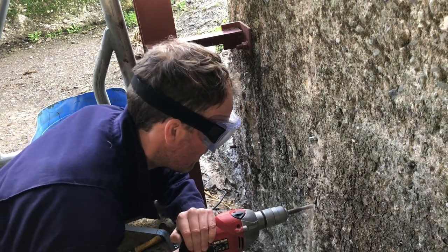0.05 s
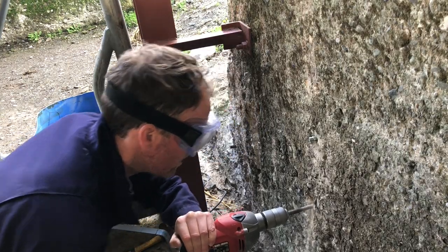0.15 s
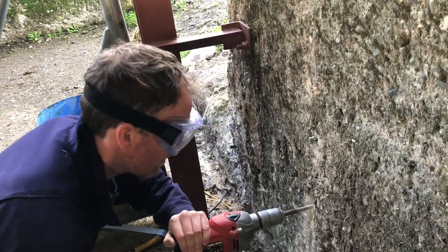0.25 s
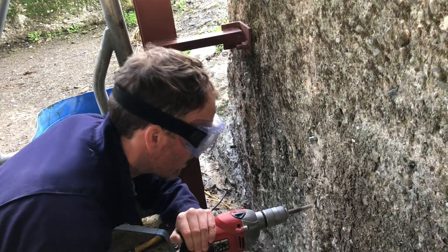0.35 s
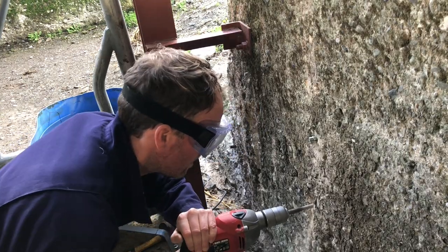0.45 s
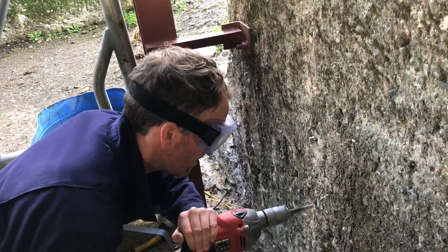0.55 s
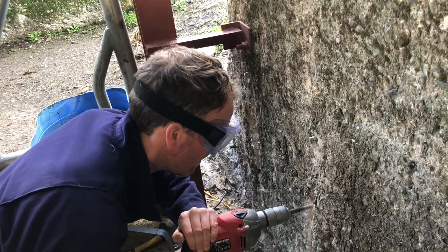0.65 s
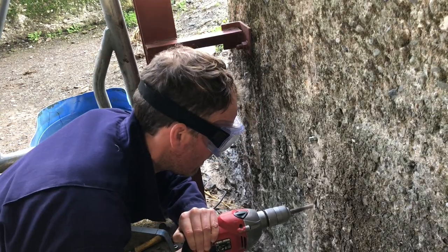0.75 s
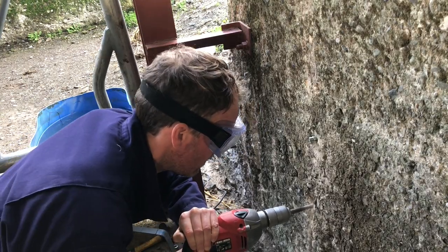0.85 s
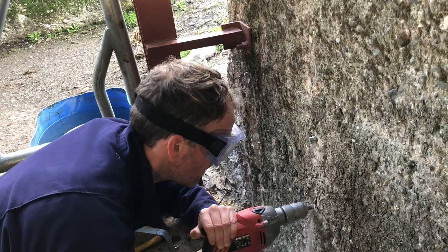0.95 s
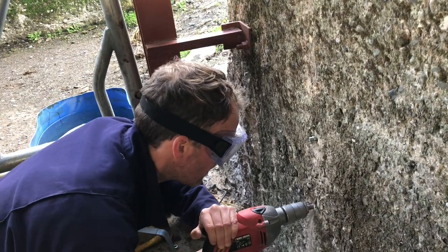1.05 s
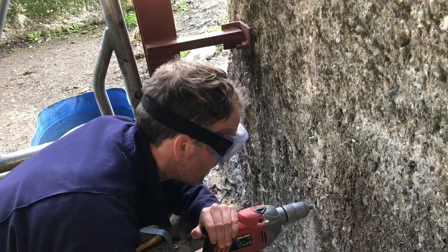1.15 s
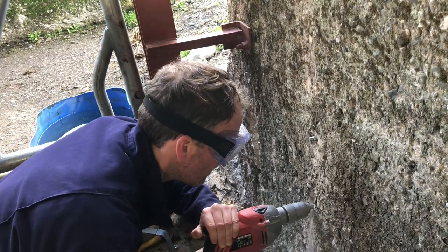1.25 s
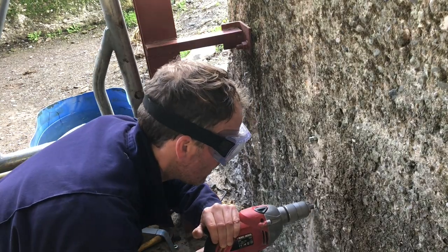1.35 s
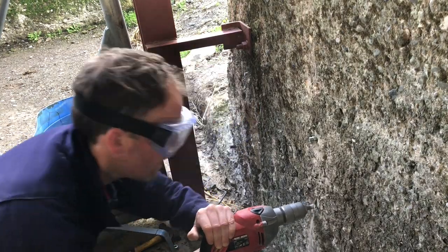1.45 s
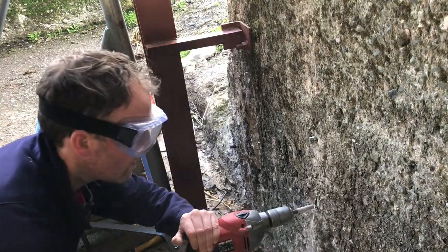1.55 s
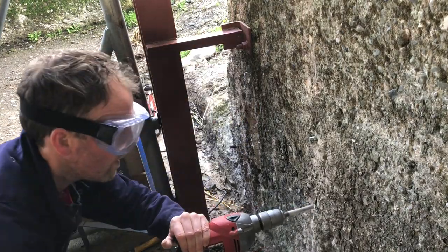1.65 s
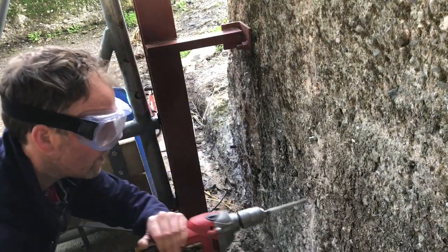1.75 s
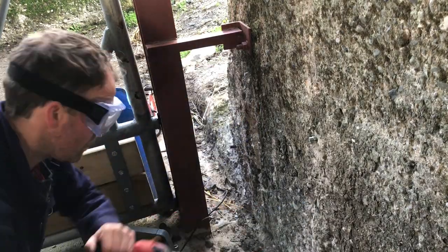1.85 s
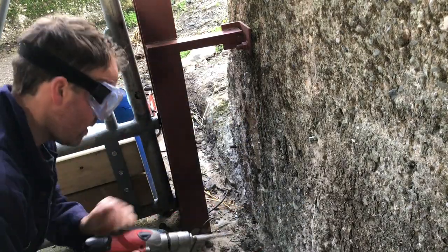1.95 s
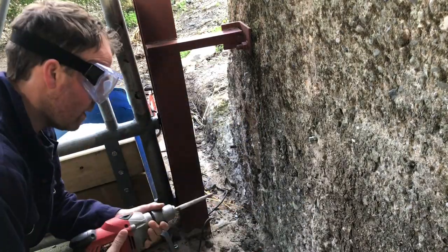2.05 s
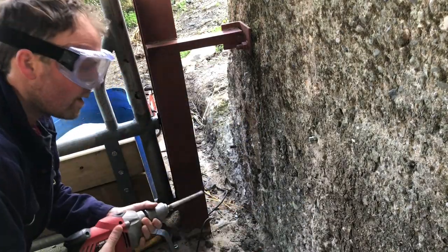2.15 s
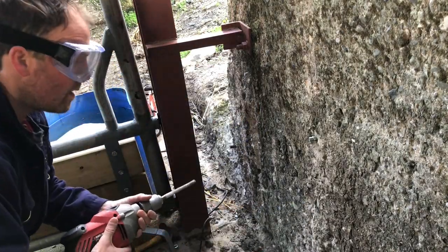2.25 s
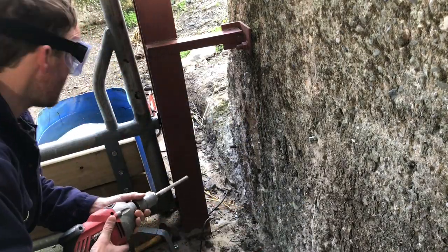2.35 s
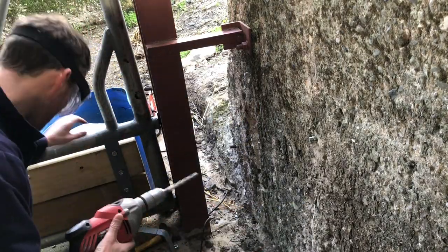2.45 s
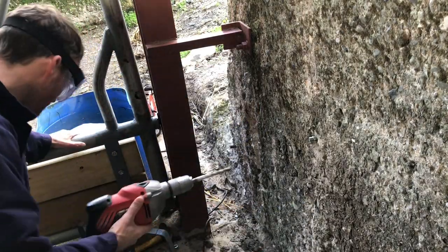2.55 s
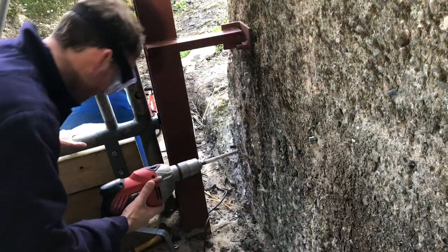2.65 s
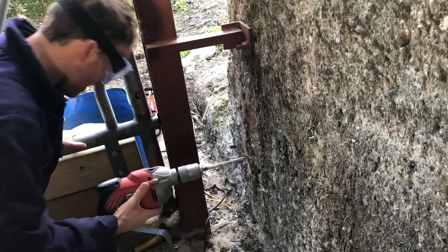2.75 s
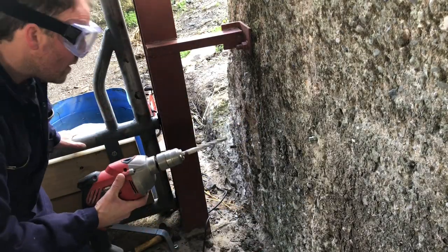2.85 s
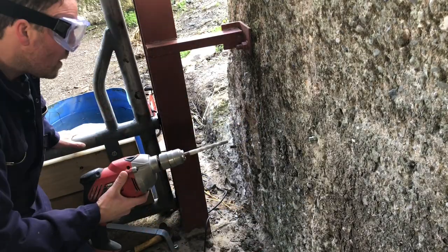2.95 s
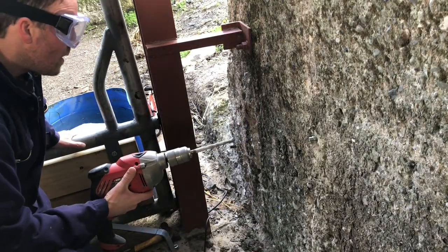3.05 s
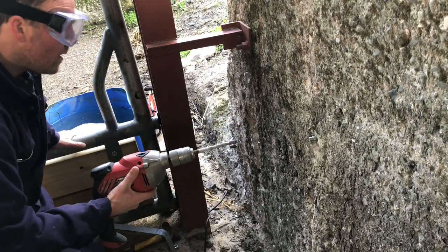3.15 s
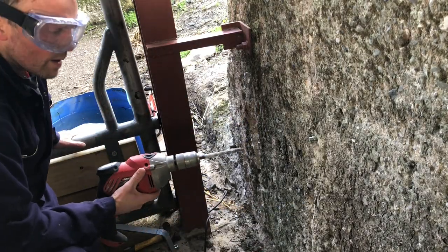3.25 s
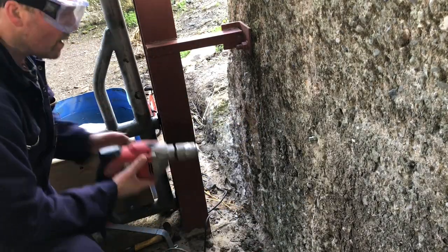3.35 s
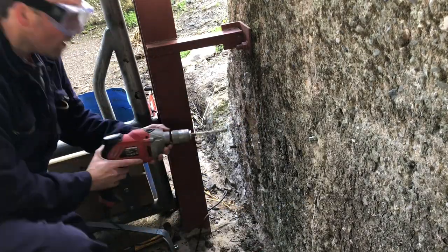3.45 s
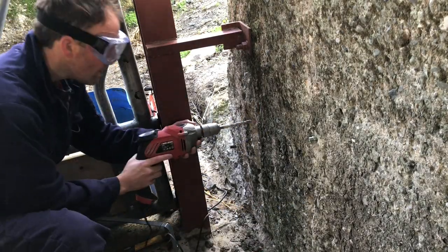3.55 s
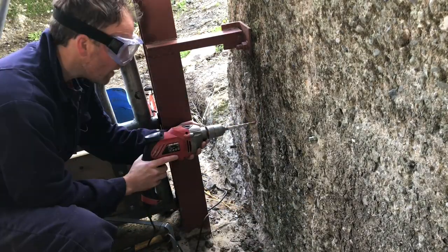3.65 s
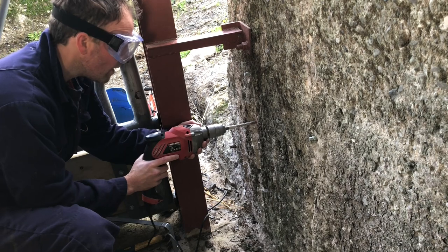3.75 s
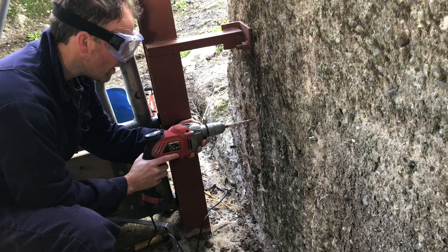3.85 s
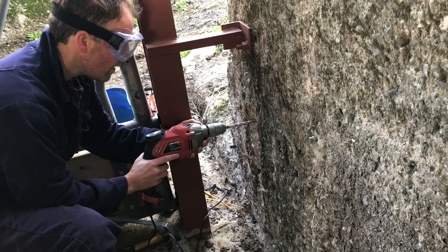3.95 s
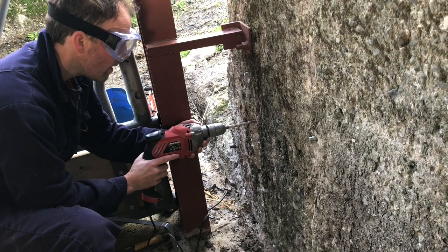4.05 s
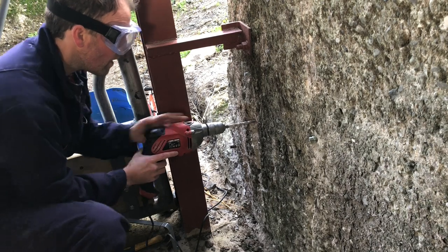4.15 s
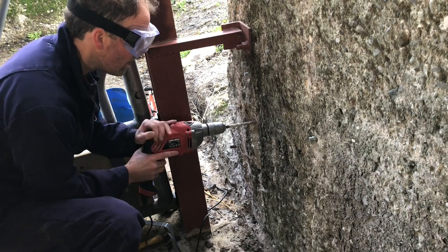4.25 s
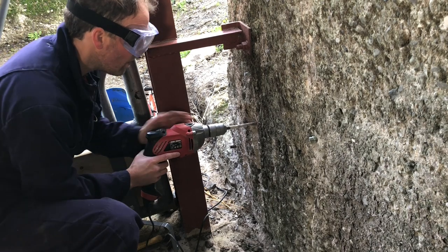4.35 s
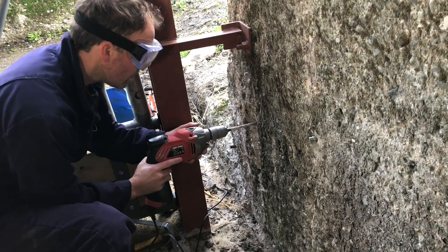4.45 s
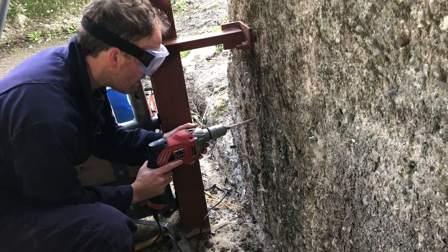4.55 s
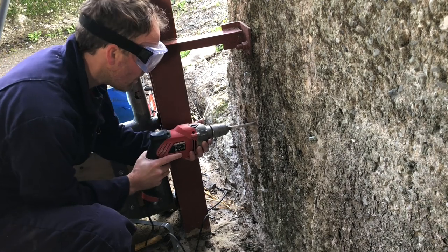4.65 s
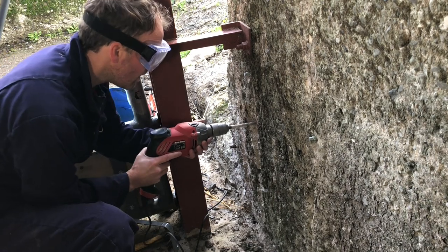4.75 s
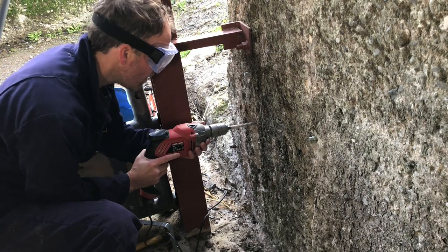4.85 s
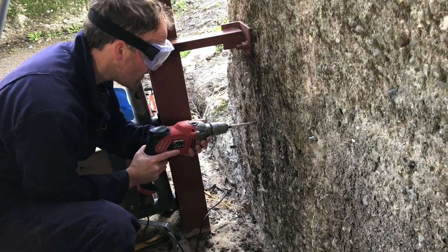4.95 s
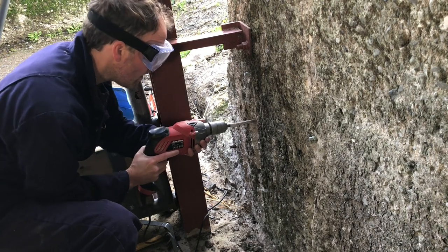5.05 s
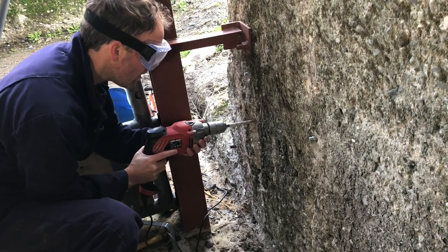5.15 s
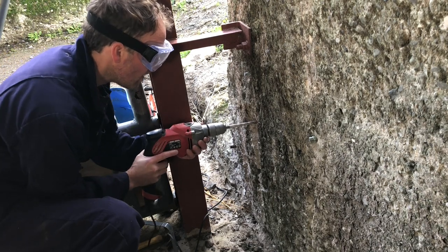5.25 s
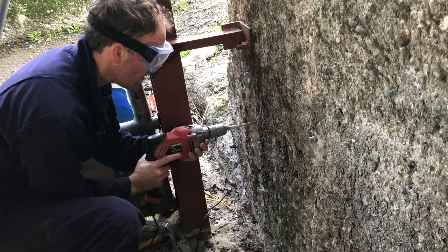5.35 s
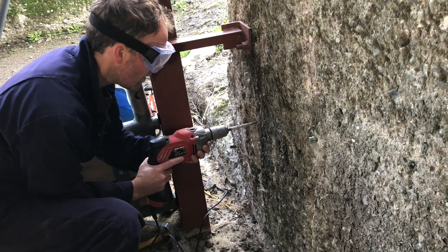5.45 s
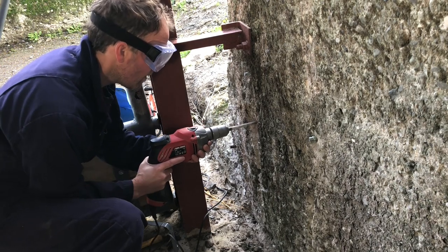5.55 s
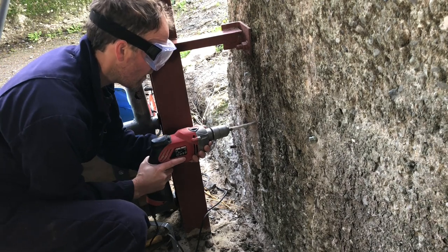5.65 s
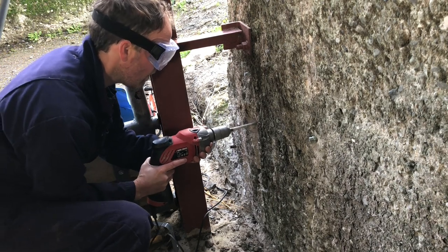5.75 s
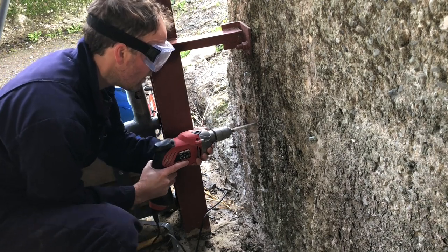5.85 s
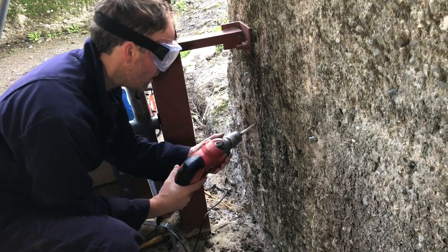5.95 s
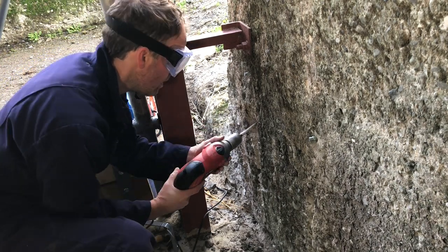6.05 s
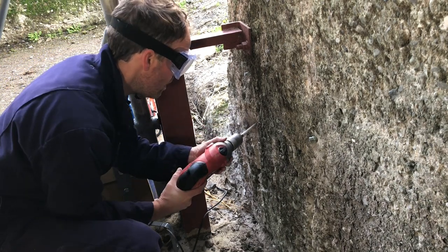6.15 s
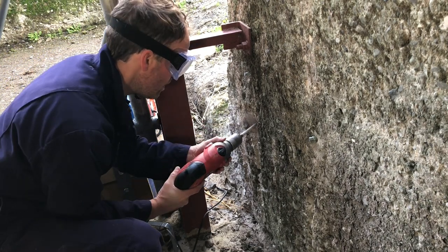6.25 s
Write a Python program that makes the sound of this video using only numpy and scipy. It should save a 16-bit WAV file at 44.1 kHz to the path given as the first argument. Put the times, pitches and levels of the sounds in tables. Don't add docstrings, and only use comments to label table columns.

```python
import sys
import numpy as np
from scipy import signal
from scipy.fft import rfft, irfft, next_fast_len
from scipy.io import wavfile
from scipy.ndimage import uniform_filter1d

SR = 44100
rng = np.random.default_rng(int(sys.argv[2]) if len(sys.argv) > 2 else 0)


def materialize(psi):
    bounded = np.clip(np.atleast_2d(psi).T, -1, 1)
    quanta = np.round(bounded * 32767).astype(np.int16)
    wavfile.write(sys.argv[1], SR, quanta)


def volts_from_db(level):
    exponent = np.asarray(level, float) / 20
    return 10 ** exponent


N = 277830

CLICKS_PER_TURN = 7.563
# start_s, end_s
LOUD = [
    (0, .175),
    (.32, 1.44),
    (5.56, 5.81),
    (6.07, 6.4),
]
# start_s, end_s
SEATED = [
    (0, .18),
    (.55, 1.455),
    (5.54, 5.83),
    (6.06, 6.4),
]
# time_s, click_rate_hz, effort_db, whine_db (of the click rate)
TAIL_OF_BURST = [(0, 1790, -25, -29.5), (.06, 1624, -24, -39.5), (.11, 1592, -22.5, -43),
                 (.145, 1660, -24.5, -36.5), (.17, 1825, -27, -36), (.18, 1860, -35, -49)]
EASED_OFF = [(.185, 1524, -36.5, -52), (.24, 1562, -34.5, -48.5), (0.324, 1667, -31, -44)]
BITE = [(.337, 2651, -24, -36), (.44, 2245, -23, -27), (.51, 1990, -24, -26.5), (.555, 1838, -24.5, -29),
        (.645, 1882, -24.5, -29.5), (.72, 1870, -23.5, -29.5), (.795, 1792, -22, -32.5),
        (.86, 1645, -24, -35), (.925, 1684, -22.5, -37.5)]
DEEPER = [(0.946, 1975, -24.5, -20.5), (.958, 1945, -24.5, -31), (.995, 1883, -26, -30.5),
          (1.055, 1861, -26, -31), (1.1, 1793, -25, -33), (1.2, 1781, -24.5, -35),
          (1.261, 1675, -24.5, -35), (1.4, 1610, -25.5, -40.5), (1.445, 1700, -26, -41.5)]
PULL_OUT = [(1.47, 1352, -40.5, -62), (1.51, 1426, -36, -57), (1.64, 1655, -32, -46),
            (1.699, 1730, -31.5, -40.5), (1.771, 1770, -31.5, -40.5), (1.9, 1470, -36.5, -57)]
RUN_DOWN = [(2.0, 1334, -35.5, -59), (2.3, 910, -39.6, -53), (2.55, 707, -42.5, -58), (2.88, 507, -46, -71),
            (3.2, 333, -48.3, -80), (3.4, 229, -50.5, -80), (3.66, 106, -57, -85), (3.79, 46, -62.5, -90),
            (3.86, 14, -87, -90)]
NUDGE = [(4.245, 214.8, -72, -80.5), (4.252, 219.2, -50, -75), (4.275, 290.3, -39.5, -68),
         (4.3, 390, -38.5, -58), (4.33, 440.4, -35, -57), (4.385, 485, -37.5, -65),
         (4.405, 490.7, -43, -67), (4.48, 488.5, -45.5, -65)]
SECOND_NUDGE = [(4.709, 482, -47, -71), (4.743, 482.3, -42.5, -65), (4.752, 474.8, -37, -65),
                (4.795, 479, -35, -65), (4.93, 475.6, -45.5, -65), (5.02, 471.8, -40.5, -65)]
CRAWL = [(5.04, 469.7, -38, -65), (5.181, 469.3, -36.5, -64), (5.298, 465, -35, -61.5),
         (5.459, 416, -33.5, -52.5)]
REV = [(5.5, 569, -30, -57), (5.55, 959.5, -23, -37), (5.6, 1190, -22.5, -35.5), (5.68, 1252, -22, -37),
       (5.78, 1157, -22, -32), (5.806, 1161, -22, -35), (5.825, 1174, -27.5, -44)]
LAST_BURST = [(5.84, 1184, -40.5, -45), (5.89, 1100, -33, -49), (5.9, 1100, -29, -54),
              (6.0, 923, -25.5, -53), (6.05, 748, -25.5, -43), (6.1, 1280, -20, -37),
              (6.15, 2037, -23.5, -32), (6.2, 2188, -22, -26.5), (6.3, 2165, -22.5, -27.5)]
PULLS = [TAIL_OF_BURST, EASED_OFF, BITE, DEEPER, PULL_OUT, RUN_DOWN,
         NUDGE, SECOND_NUDGE, CRAWL, REV, LAST_BURST]


def unit(x):
    return x / np.sqrt(np.mean(x ** 2) + 1e-20)


def curves(rows):
    s, *cols = np.transpose(rows)
    return [np.interp(np.arange(N) / SR, s, c) for c in cols]


def gate(spans, fade_s):
    t = np.arange(N) / SR
    inside = sum((t >= a) & (t <= b) for a, b in spans)
    return uniform_filter1d(np.minimum(inside, 1.0), int(fade_s * SR) + 1)


def wobble(rate_hz):
    knots = rng.standard_normal(int(N * rate_hz / SR) + 2)
    return np.interp(np.arange(N) * rate_hz / SR, np.arange(len(knots)), knots)


def coloured(x, spectrum):
    m = next_fast_len(N + 8192)
    hz, db = np.transpose(spectrum)
    gain = volts_from_db(np.interp(np.log(np.fft.rfftfreq(m, 1 / SR) + 1), np.log(hz + 1), db))
    return unit(irfft(rfft(x, m) * gain, m)[:N])


def patchy(patchy_db, frames=10):
    z = signal.stft(rng.standard_normal(N), nperseg=512)[2]
    field = uniform_filter1d(rng.standard_normal(z.shape), 6, 0)
    field = uniform_filter1d(field, frames, 1)
    return signal.istft(z * volts_from_db(patchy_db * unit(field)), nperseg=512)[1][:N]


def resonance(modes, hz):
    grid_hz = np.arange(SR // 2)
    gain = sum(volts_from_db(db) / (1 + (2 * (grid_hz - centre) / width) ** 2) for centre, width, db in modes)
    return gain[np.minimum(hz, grid_hz[-1]).astype(int)]


def per_pull():
    # rattle_db and grind_db (over effort), click_sharpness (0-1),
    # first_wall_share (0-1), gear_strain_db
    contacts = [(2.5, -23, 0.7, 0.7, 0), (-0.5, -17.5, 0.6, .55, -6.5), (-1, -24, 0.4, 0.7, -2),
                (-1, -27, .35, 0.6, 1.5), (-1, -15.5, 0.2, 0.62, 0), (-6, -16, .05, 0.81, 0),
                (1, -12, 0.3, 0.03, 0), (0, -13, 0.6, 0.13, 0), (2, -15.5, .15, 0, -4),
                (-0.5, -21.5, .05, 0.32, 0), (-1, -31, 0.5, 0.1, 0.5)]
    starts_s = np.array([pull[0][0] for pull in PULLS])
    t = np.arange(N) / SR
    now = np.searchsorted(starts_s, t, side="right") - 1
    held = [uniform_filter1d(c[now], size=400) for c in np.transpose(contacts)]
    return held + [t - starts_s[now]]


def whine(rate_hz, cycles, effort_db, whine_db):
    # start_s, end_s
    biting = [(0, .18), (.33, 1.455), (5.04, 5.83), (5.91, 6.4)]
    # start_s, end_s
    singing = [(0, .178), (.2, .325), (.335, .93), (.95, 1.455), (1.5, 3.15), (4.265, 4.4), (5.04, 5.84),
               (5.91, 6.4)]
    # overtone, armature_turns_away, seated_db, loose_db (over effort)
    pressed = [(1, -3, -30, -13), (1, -2, -28, -8), (1, -1, -24, -8), (1, 1, -12, -8), (2, -4, -30, -12),
               (2, -1, -9, -22), (2, 0, -8.5, -13), (2, 1, -10, -24), (3, -2, -18, -24), (3, 0, -15, -22),
               (5, 0, -23, -30)]
    neighbours = {1: (-3, -2, -1, 2, 3), 2: (-3, -2, 2, 3), 3: (-2, -1, 1, 2), 4: (-1, 0, 1, 3), 5: (-1, 2)}
    # centre_hz, width_hz, gain_db
    gearbox = [(2200, 750, -3), (3170, 200, -2), (3450, 260, 0), (4030, 240, -4), (5600, 800, -4)]
    # centre_hz, width_hz, gain_db
    gearbox_later = [(1900, 600, -6), (2480, 260, -3), (3720, 320, 1), (4290, 420, 2), (6050, 500, -1)]
    # centre_hz, width_hz, gain_db
    housing = [(2150, 800, -4), (3450, 500, 1), (4080, 400, -1), (5450, 900, -1), (7300, 1500, -3)]
    second_hole_s, mesh_per_click = 4, 4.62

    strain_db = per_pull()[4]
    bite = gate(biting, fade_s=0.024) * volts_from_db(effort_db + strain_db)
    seated = gate(SEATED, fade_s=0.068)
    later = np.arange(N) > second_hole_s * SR
    lines = [(1, 0, volts_from_db(whine_db))]

    mesh = resonance([(4700, 2000, -16)], mesh_per_click * rate_hz)
    lines.append((mesh_per_click, 0, volts_from_db(effort_db) * gate([(1.9, 2.5)], fade_s=.15) * mesh))

    for k, n, seated_db, loose_db in pressed:
        hz = rate_hz * (k + n / CLICKS_PER_TURN)
        outlet = np.where(later, resonance(gearbox_later, hz), resonance(gearbox, hz))
        level_db = loose_db + (seated_db - loose_db) * seated + 1.6 * wobble(9)
        lines.append((k, n, bite * volts_from_db(level_db) * outlet))

    load = volts_from_db(-46) * gate(LOUD, fade_s=.03)
    for k, away in neighbours.items():
        for n in away:
            body = .08 + resonance(housing, rate_hz * (k + n / CLICKS_PER_TURN))
            lines.append((k, n, load * volts_from_db(3 * wobble(11)) * body))

    spin = 2 * np.pi * (cycles + .02 * wobble(120))
    tone = 0
    for k, n, gain in lines:
        phase = (k + n / CLICKS_PER_TURN) * spin + 2 * np.pi * rng.random()
        tone = tone + gain * volts_from_db(0.77 * wobble(70)) * np.sin(phase)
    return volts_from_db(4.2) * tone * gate(singing, fade_s=.012)


def skids():
    # start_s, level_db (over the scrape), decay_s
    slips = [(4.488, 5, .011), (4.606, 8, .008), (4.65, 2, .01), (4.678, 12, .004), (4.687, 8, .008)]
    t = np.arange(N) / SR
    return 1 + sum(volts_from_db(db) * (t > s) * np.exp(-np.abs(t - s) / decay_s) for s, db, decay_s in slips)


def clatter(cycles, effort_db):
    # pitch_hz, level_db (per Hz)
    hiss_spectrum = [(1760, -33), (3000, -8.5), (3110, -17.5), (3560, -7.5), (4060, -5.5), (5390, -6.5),
                     (5980, -6), (6450, -6), (7150, -5), (8500, -1), (9960, -3), (11100, -4.5),
                     (12400, -3.5), (14100, -2.5), (15600, -5)]
    first_wall = [(410, -56.5), (700, -43), (1050, -14.5), (1310, -13.5), (1650, -6.5), (2500, -4),
                  (2940, -6), (3300, 2.5), (3780, -6), (4000, -13.5), (4320, -16.5), (7000, 2), (9100, -23),
                  (15400, -120)]
    second_wall = [(410, -52), (700, -14), (1000, -5.5), (1330, -2.5), (1830, 0.5), (2080, 5), (2470, 3),
                   (3460, -6), (3850, -2.5), (5090, -6.5), (7000, -10), (9100, -51), (15400, -120)]
    grind_spectrum = [(150, -43.5), (300, -20.5), (700, -11), (1300, -6), (1700, -6), (2600, -30),
                      (4400, -120)]
    fan_spectrum = [(2500, -51), (3300, -3), (4500, 3.5), (5600, 1), (6500, -20), (8600, -15), (10500, -46),
                    (15000, -39)]
    jolt_db, jolt_s = 4, .03
    damped_db = -4.5

    rattle_db, grind_db, sharp, first, _, since_s = per_pull()
    rattle_db = rattle_db + jolt_db * np.exp(-since_s / jolt_s) + damped_db * gate(SEATED, fade_s=0.057)
    sharp, first = np.clip(sharp, 0, 1), np.clip(first, 0, 1)

    click_size = np.tanh(rng.standard_normal(N))[cycles.astype(int)]
    strike = volts_from_db(8 * click_size * sharp) * np.exp(-3 * (cycles % 1))
    turn = 1 + 0.12 * np.sin(2 * np.pi * cycles / CLICKS_PER_TURN)
    beat = turn * (np.sqrt(1 - sharp) + 3.4 * np.sqrt(sharp) * strike)
    beat = beat / np.sqrt(np.abs(uniform_filter1d(beat ** 2, size=2600))) * skids()

    hiss = coloured(beat * patchy(patchy_db=2.1, frames=45), hiss_spectrum)
    blows = beat * patchy(patchy_db=2.5)
    rattle = first * coloured(blows, first_wall) + (1 - first) * coloured(blows, second_wall)
    grind = coloured(patchy(patchy_db=-3.5), grind_spectrum)
    idling = gate([(1.75, 3.9)], fade_s=0.43)
    fan = volts_from_db(-10.5) * idling * coloured(patchy(patchy_db=4, frames=45), fan_spectrum)
    return volts_from_db(effort_db) * (hiss + fan + volts_from_db(rattle_db - 4.5) * rattle + volts_from_db(grind_db) * grind)


def surroundings():
    # pitch_hz, level_db (per Hz)
    air_spectrum = [(35, -100), (60, -58.5), (160, -25.5), (244, -18.5), (287, -20), (492, -21.5),
                    (579, -17.5), (715, -26), (3670, -32), (16000, -60.5)]
    # time_s, pitch_hz, level_db
    engine = [(.3, 352.4, -61), (.5, 275.5, -69), (1.3, 223.2, -70), (1.5, 201.5, -95), (2.5, 239, -68),
              (3.15, 303, -65), (3.33, 311.6, -68), (3.42, 238.5, -64.5), (4.15, 253.7, -67.5),
              (4.35, 195, -76), (4.6, 213.5, -72.5), (5.4, 210.9, -70), (6.3, 269.3, -66)]
    hz, db = curves(engine)
    cycles = np.cumsum(hz) / SR + 0.082 * wobble(30)
    drone = volts_from_db(db - 1.5 + 2.4 * wobble(13)) * np.sin(2 * np.pi * cycles)
    return volts_from_db(-68) * coloured(patchy(patchy_db=1.5), air_spectrum) + drone


def whistle(rate_hz, effort_db):
    # centre_hz, width_hz, gain_db
    vents = [(4950, 200, 2), (6900, 1200, 1), (8400, 1600, 1), (11500, 1200, 0), (13300, 1200, -2),
             (15000, 1200, -1)]
    bars_per_click = 23.1
    hz = bars_per_click * rate_hz
    db = -59 - .85 * np.abs(effort_db + 49)
    cycles = np.cumsum(hz) / SR + 0.065 * wobble(250)
    tone = 0
    for k in range(1, 9):
        level_db = db - .8 * k - 3 * (k % 2 == 0) + 4 * wobble(14)
        audible = k * hz < SR / 2
        tone = tone + resonance(vents, k * hz) * volts_from_db(level_db) * np.sin(2 * np.pi * k * cycles) * audible
    return volts_from_db(8) * tone * gate([(2.55, 3.77)], fade_s=.05)


def drill():
    rate_hz, effort_db, whine_db = curves(np.concatenate(PULLS))
    cycles = np.cumsum(rate_hz) / SR
    tones = whine(rate_hz, cycles, effort_db, whine_db) + whistle(rate_hz, effort_db)
    return tones + clatter(cycles, effort_db)


def knocks():
    # start_s, peak_db, centre_hz, width_octaves, t60_s
    contacts = [
        (2.765, -55, 350, .8, .07),
        (3.482, -40, 800, 1.4, .03),
        (3.548, -42, 1500, .8, .17),
        (3.903, -63, 7000, 1.1, .02),
        (4.07, -60, 700, .7, .1),
        (4.14, -41, 8000, 1.8, .012),
        (4.14, -45, 2100, .6, .02),
        (4.249, -44, 9000, 1.3, .012),
    ]
    # pitch_hz, level_db, t60_s
    post = [(490, -60, .3), (684, -55, .3), (1390, -55, .2), (2160, -56, .1)]
    ring_s = 3.549
    out, t = np.zeros(N + SR), np.arange(SR // 2) / SR
    f = np.fft.rfftfreq(len(t), 1 / SR) + 1
    for s, db, hz, octaves, t60_s in contacts:
        band = np.exp(-(np.log2(f / hz) / octaves) ** 2) / np.sqrt(f)
        puff = unit(irfft(rfft(rng.standard_normal(len(t))) * band, len(t)))
        out[round(s * SR):][:len(t)] += volts_from_db(db - 60 * t / t60_s) * puff * (1 - np.exp(-t / 0.00068))
    for hz, db, t60_s in post:
        wander = np.cumsum(rng.normal(0, 0.062, len(t)))
        ring = volts_from_db(db - 60 * t / t60_s) * np.sin(2 * np.pi * hz * t + wander)
        out[round(ring_s * SR):][:len(t)] += ring
    return out[:N]


def scene():
    mono = drill() + knocks() + surroundings()
    return np.array([mono, mono])


def top_cut(x):
    return signal.sosfilt(signal.butter(12, 17080, fs=SR, output="sos"), x)


def record(dry):
    # pitch_hz, level_db (per Hz)
    thrum_spectrum = [(15, 5), (60, -0.5), (150, 2.5), (250, -15.5), (400, -120)]
    clip_at = .5
    dry = dry / (1 + (dry / clip_at) ** 4) ** .25
    x = signal.sosfilt(signal.butter(5, 155, "highpass", fs=SR, output="sos"), dry)
    x = x + volts_from_db(-70.5) * gate(LOUD, fade_s=.03) * coloured(patchy(patchy_db=0.0), thrum_spectrum)
    m = next_fast_len(N + 8192)
    x = irfft(rfft(x, m) * (np.fft.rfftfreq(m, 1 / SR) < 15830), m)[:, :N]
    return top_cut(x)


dry = scene()
out = record(dry)
materialize(out)
```